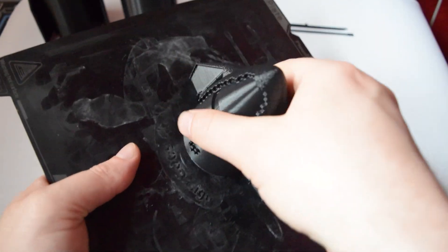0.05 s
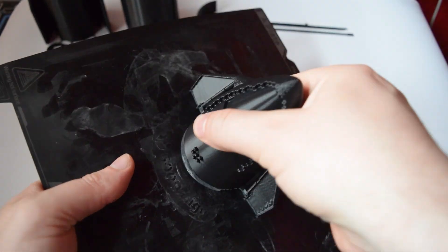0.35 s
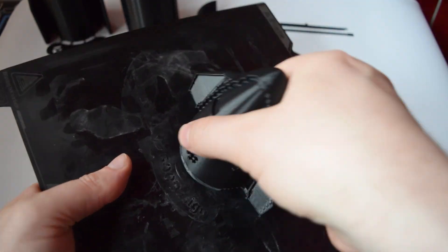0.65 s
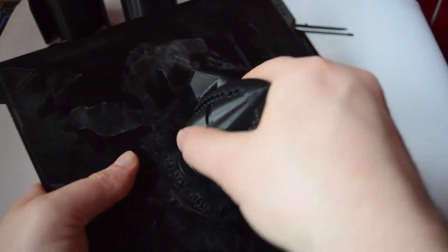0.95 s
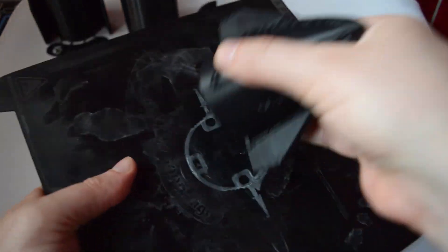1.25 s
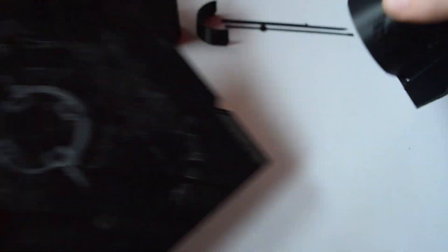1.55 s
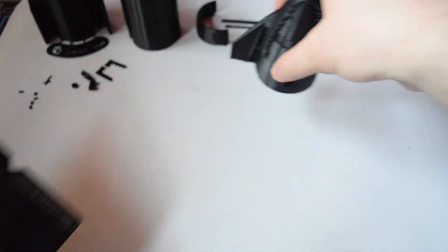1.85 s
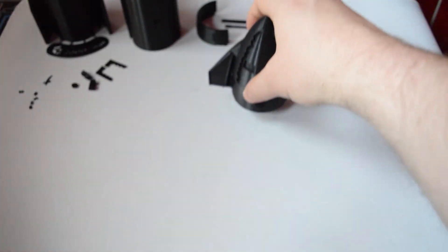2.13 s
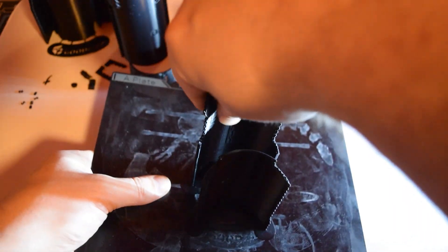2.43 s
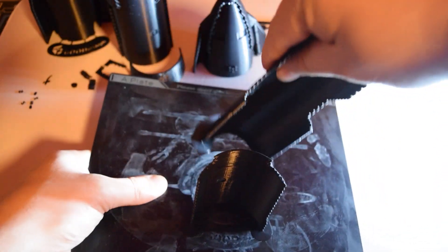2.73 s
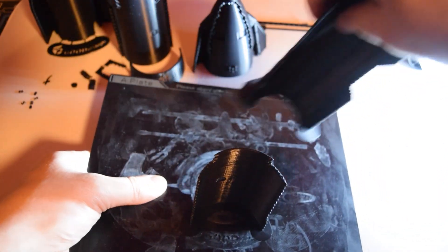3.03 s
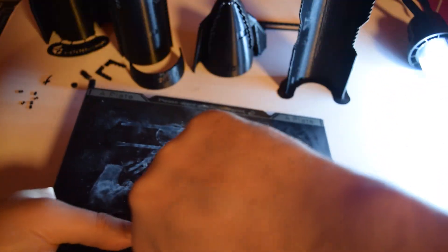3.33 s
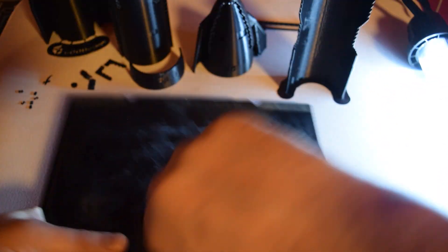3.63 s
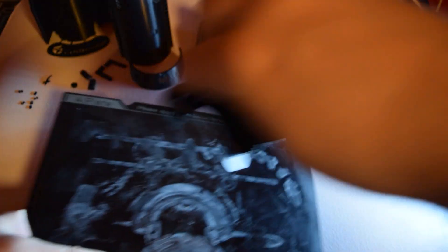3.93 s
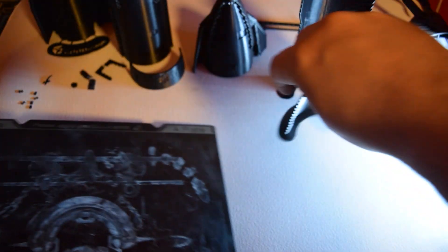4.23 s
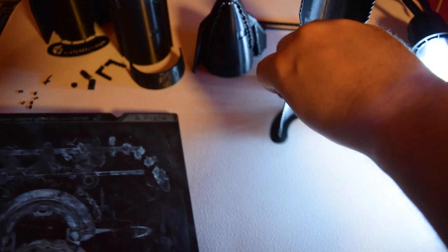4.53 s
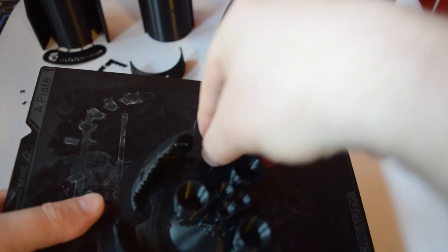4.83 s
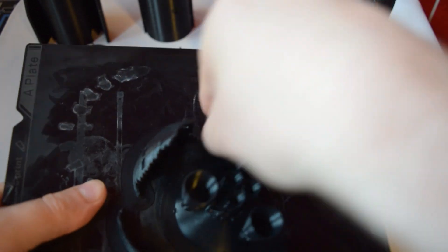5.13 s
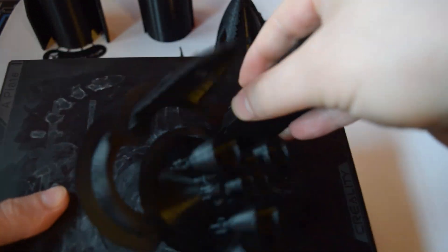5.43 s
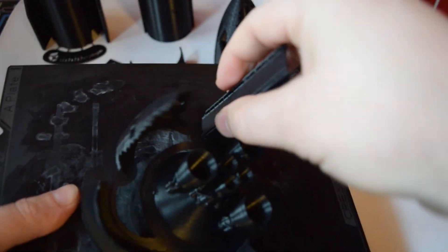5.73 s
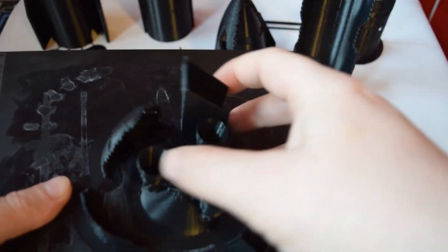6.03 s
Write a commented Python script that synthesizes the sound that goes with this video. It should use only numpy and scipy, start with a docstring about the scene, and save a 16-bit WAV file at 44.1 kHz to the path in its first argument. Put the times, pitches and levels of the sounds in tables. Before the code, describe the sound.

Hollow plastic parts snap off a flexible steel plate with sharp cracks, light knocks and faint rubbing in a small room.

```python
"""At a desk in a small room, hollow printed plastic parts are snapped off a flexible steel build plate.
Each snap is a bright crack as the bond breaks, then the hollow part, the desk and the room ring briefly.
Loose parts knock and tinkle, thin brims (flat rims around a part) tear in crackles, hands bump and rub.
The room echoes over a faint hum, and the close microphone overloads on the hardest snaps."""
import sys
import numpy as np
from scipy import signal
from scipy.fft import rfft, irfft
from scipy.io import wavfile

SR = 44100
rng = np.random.default_rng(int(sys.argv[2]) if len(sys.argv) > 2 else 0)


def put_to_file(sound):
    """Save the sound as 16-bit audio at rate SR, in the file named by the first command-line argument."""
    columns = np.atleast_2d(sound).T  # one column per channel
    safe = np.clip(columns, -1, 1)
    whole_steps = np.round(safe * 32767)
    wavfile.write(sys.argv[1], SR, whole_steps.astype(np.int16))


N = 276507
TIME = np.arange(N) / SR

# A "fade time", or t60, is how long a sound takes to drop by 60 dB.
# a part breaks free: (time [s], crack level [dB], crack pitch [Hz], crack fade time [s], ring level [dB])
SNAP_HITS = [(0.2666, -12.5, 4810, 0.02, -15.5), (1.11, 3, 5030, 0.026, -13),
             (1.1135, -5.5, 7640, 0.012, 3.5), (2.5786, 2.5, 8390, 0.019, -16),
             (2.5867, -11, 8000, 0.073, -7), (2.599, -1, 6500, 0.012, -14.5),
             (2.6212, -2, 7800, 0.0088, -28.5), (2.631, -14.5, 6960, 0.028, -40),
             (2.6591, -5.5, 5400, 0.032, -17.5), (3.541, -44.5, 6730, .03, -41.5),
             (3.643, 8, 7130, 0.014, -2), (3.7101, 0.5, 5280, 0.03, -13), (5.2345, -14, 8700, 0.13, -7.5),
             (5.2464, -2, 7280, 0.025, -11), (5.287, -9, 5860, 0.0093, -35), (5.2918, 5, 5660, 0.0077, -13),
             (5.296, 5, 4390, 0.01, -32), (5.3121, -8, 4600, 0.0081, -46), (5.407, -14, 6300, 0.015, -54),
             (5.416, -14.5, 11100, 0.027, -28), (5.728, -38, 11900, .04, -64),
             (5.9204, -25.5, 9840, 0.018, -26)]
# loose parts knock on the plate and on each other: (time [s], crack level [dB], ring level [dB])
KNOCK_HITS = [(0.2656, -25, -24), (.9107, -50, -34), (0.942, -51, -38), (1.0209, -53, -35),
              (1.042, -41, -27.5), (1.561, -42.5, -53.5), (2.5705, -16, -1.5), (3.651, -26.5, -9.5),
              (3.941, -43.5, -29), (4.046, -45, -44), (4.211, -48.5, -45), (4.956, -45, -17),
              (5.21, -44.5, -39), (5.4708, -26, -30.5), (5.572, -36, -51), (5.605, -27.5, -34),
              (5.656, -24, -24), (5.863, -24, -41), (5.881, -24, -23.5), (5.911, -31, -39),
              (5.924, -24.5, -14.5), (5.9475, -35, -24), (6.044, -44.5, -34), (6.1979, -46, -34)]
# the hollow note of the part in hand: (start time [s], pitch [Hz], fade time [s])
PART_NOTES = [(0, 710, 0.13), (.7, 920, 0.015), (3.2, 980, 0.023), (3.8, 817, 0.029), (5.275, 1791, 0.074),
              (5.34, 1070, 0.058), (5.54, 1578, 0.071), (5.8, 1077, 0.058), (5.9, 960, 0.021)]
# desk and room resonances that ring briefly after each hit: (pitch [Hz], level [dB], fade time [s])
DESK_ROOM_NOTES = [(250.9, -31, 0.086), (394, -28.5, 0.14), (450, -26, 0.045), (572.5, -23.5, 0.19),
                   (644.3, -19.5, 0.12), (746.5, -12.5, 0.069), (821, -15, 0.19), (868, -22.5, 0.28),
                   (889, -19, 0.32), (976, -14, 0.13), (1071, -17.5, 0.19), (1180, -21, 0.055),
                   (1274, -28.5, 0.32), (1404, -30.5, 0.31), (1510, -20.5, 0.057), (1772, -27, 0.11),
                   (2030, -25, 0.11)]
# thin fins and shells ring on after a hit: (time [s], pitch [Hz], level [dB], fade time [s])
FIN_RINGS = [(0.2652, 1160, -17, 0.032), (0.2654, 1520, -20.5, 0.047), (.2654, 1890, -26, .06),
             (.2666, 4530, -22.5, 0.039), (0.2658, 7930, -25, 0.027), (2.6594, 5250, -12, 0.043),
             (3.7118, 5720, -23, .08), (5.656, 3750, -17, 0.011)]
# the notes of a small curved shell: (pitch [Hz], level [dB], fade time [s])
SHELL_NOTES = [(1680, 0.5, 0.24), (2513, 0, 0.14), (3640, -7, 0.19), (4700, -0.5, 0.11),
               (11050, -13.5, 0.33)]
# that shell tinkles as it is lifted off and stood on the desk: (time [s], level [dB])
SHELL_TINKLES = [(3.9, -49.5), (4.044, -61), (4.11, -65.5), (4.208, -59), (4.315, -58.5)]
# hands, parts and plate bump the desk: (time [s], level [dB], pitch [Hz])
DESK_BUMPS = [(0.533, -46.5, 302), (0.91, -37, 263), (.925, -34.5, 590), (1.005, -35.5, 1050),
              (1.041, -33.5, 227), (1.043, -29.5, 673), (3.404, -29.5, 910), (3.94, -42.5, 253),
              (4.046, -30, 336), (4.11, -41.5, 318), (4.211, -34, 433), (4.595, -39, 226),
              (4.9499, -23, 337), (4.9605, -30, 480), (5.07, -39, 693), (5.184, -33.5, 610),
              (5.2, -28.5, 264.4), (5.207, -16.5, 549), (5.2125, -13, 768), (5.233, -29.5, 275),
              (5.922, -40.5, 235), (6.062, -29, 838), (6.196, -50.5, 334)]
# brims tear loose and rough edges scrape: (start [s], end [s], level [dB])
BRIM_TEARS = [(2.587, 2.611, -27), (2.652, 2.66, -27.5), (3.64, 3.663, -16), (3.903, 3.933, -49.5),
              (5.232, 5.265, -26.5), (5.296, 5.33, -45), (5.332, 5.411, -39.5), (5.35, 5.387, -32.5),
              (5.868, 5.887, -33), (6.061, 6.086, -48.5)]
# skin and plastic slide: (start [s], end [s], level [dB])
FINGER_RUBS = [(0.004, 0.08, -69.5), (0.534, 0.533, -48), (0.88, 0.956, -65.5), (1.573, 1.654, -68),
               (1.788, 1.943, -71), (2.229, 2.463, -62.5), (2.838, 2.912, -69), (2.965, 3.144, -75.5),
               (3.169, 3.526, -62), (3.886, 4.137, -62.5), (4.142, 4.417, -68.5), (4.551, 4.619, -58),
               (5.454, 5.618, -66.5), (5.973, 6.27, -68.5)]
# the tone of cracking plastic: (frequency [Hz], level [dB])
CRACK_TONE = [(60, -10.5), (220, -12.5), (500, -4.5), (1100, 2.5), (1700, 4.5), (2600, -1.5), (4000, -2),
              (6000, -3.5), (8500, -2.5), (10500, -3.5), (13000, -7.5), (16000, -14.5)]
# the tone of a rub's hiss: (frequency [Hz], level [dB])
HISS_TONE = [(200, -6.5), (900, 2.5), (2200, 1), (3300, -4.5), (5000, -1.5), (6800, -6), (9400, -6),
             (12000, -14.5), (16000, -26.5)]
# the tone of the plate's rumble under a rub: (frequency [Hz], level [dB])
RUMBLE_TONE = [(40, -14), (120, 0), (300, 8.5), (600, -8.5), (1000, -3.5), (2000, -5.5), (8000, -39)]
# the tone the walls give to echoes: (frequency [Hz], level [dB])
WALL_TONE = [(50, -7.5), (200, 0), (500, -1.5), (1000, -3), (2500, -0.5), (6000, -2.5), (10000, -3.5),
             (15000, -13.5)]
# how long the room's echo lasts: (frequency [Hz], fade time [s])
ROOM_FADES = [(100, 0.21), (400, 0.39), (900, 0.29), (2000, 0.41), (5000, .35), (9000, .27), (15000, 0.23)]
# the tone of still room air: (frequency [Hz], level [dB])
AIR_TONE = [(12, -41), (20, -22), (49, -2), (182, -12.5), (241, -14.5), (377, -17.5), (527, -17),
            (802, -17.5), (976, -14.5), (1370, -22.5), (1910, -20), (2460, -26.5), (8410, -36.5),
            (13500, -45.5), (16000, -66)]
# a faint appliance hum: (pitch [Hz], level [dB])
HUM_NOTES = [(50, -80), (100, -73.5), (242, -79.5)]

KNOCK_HZ, KNOCK_T60_S = 2800, 0.043  # a knock is duller than a snap
KNOCK_TOP_HZ = 11600  # knocks carry little above this; higher cracks reach further in proportion


def cracks(hiss_db=-9, notes_db=-2, note_count=7, spread_octaves=1.1, tick_db=-2, tick_s=0.00012):
    """The bond breaks or a part knocks: a tick stirs many high notes in the plastic; a few stand out."""
    out, t = np.zeros(N), TIME[:5000]
    for start, db, hz, t60, *_ in hits():
        noise = rng.standard_normal(len(t))
        pitches = hz * 2 ** (spread_octaves * rng.uniform(-1, 1, note_count))
        notes = sum(band(noise, pitch, q=22) for pitch in pitches)
        crack = unit(unit(band(noise, hz, q=1.9)) + gain(hiss_db) * noise + gain(notes_db) * unit(notes))
        tick = gain(tick_db) * np.exp(-t / tick_s)
        crack *= fade(t, t60) * (1 + tick)
        add(out, start, gain(db) * muffle(crack, KNOCK_TOP_HZ * hz / KNOCK_HZ))
    return shape_tone(out, CRACK_TONE)


def part_and_desk(desk_room_db=-4, reach_octaves=2.6):
    """At each snap or knock the hollow part rings, and the desk and room ring briefly with it."""
    out, t = np.zeros(N), TIME[:12000]
    note_hz = np.array(DESK_ROOM_NOTES)[:, 0]
    notes = np.array([gain(db) * np.exp(2j * np.pi * hz * t) * fade(t, t60)
                      for hz, db, t60 in DESK_ROOM_NOTES])
    for start, *_, ring_db, part_hz, part_t60 in hits():
        hollow = sine(part_hz, t) * fade(t, part_t60)
        # each hit lands on a new spot, so each note starts at a random point in its swing
        phases = np.exp(2j * np.pi * rng.random(len(notes)))
        # the part stirs the notes near its own pitch most
        distance = np.hypot(1, np.log2(note_hz / part_hz) / reach_octaves)
        desk_room = ((phases / distance) @ notes).imag
        add(out, start, gain(ring_db) * (hollow + gain(desk_room_db) * desk_room))
    return out


def hits():
    """List every snap and knock, each followed by the pitch and fade time of the part in hand."""
    knocks = [(start, db, KNOCK_HZ, KNOCK_T60_S, ring_db) for start, db, ring_db in KNOCK_HITS]
    part_changes = [start for start, _, _ in PART_NOTES[1:]]
    return [(*hit, *PART_NOTES[np.searchsorted(part_changes, hit[0])][1:]) for hit in SNAP_HITS + knocks]


def fins_and_shells(twin_ratio=1.017, twin_db=-5, rise_s=0.0008):
    """A hit spreads through a thin, nearly round shell, which rings in close pairs of notes that waver."""
    out, t = np.zeros(N), TIME[:18000]
    rise = 1 - np.exp(-(t / rise_s) ** 2)
    tinkles = [(start, hz, db + note_db, t60)
               for start, db in SHELL_TINKLES for hz, note_db, t60 in SHELL_NOTES]
    for start, hz, db, t60 in FIN_RINGS + tinkles:
        pair = sine(hz, t) + gain(twin_db) * sine(hz * twin_ratio, t, rng.random())
        add(out, start, gain(db) * pair * fade(t, t60) * rise)
    return out


def bumps(rise_s=0.0054, thud_db=-1, fade_swings=30, desk_hz=140, desk_t60=0.3):
    """A soft touch pushes slowly: a low note in a dull thud. The lower it is, the more the desk booms."""
    out, t = np.zeros(N), TIME[:9000]
    rise = 1 - np.exp(-t / rise_s)
    boom = gain(-0.5) * sine(desk_hz, t) * fade(t, desk_t60)
    for start, db, hz in DESK_BUMPS:
        thud = unit(band(rng.standard_normal(len(t)), hz, q=0.65))
        bump = (sine(hz, t) + gain(thud_db) * thud) * fade(t, fade_swings / hz)
        bump += boom * min(desk_hz / hz, 0.5) ** 2
        add(out, start, gain(db) * muffle(bump * rise, 1.4 * hz, order=5))
    return out


def tears(ticks_per_s=900, uneven_db=1.5, tick_t60=0.0042, plate_hz=1150, top_hz=12500):
    """A thin edge catches and lets go in a run of tiny uneven ticks that shake the plate."""
    out, t = np.zeros(N), TIME[:600]
    for start, end, db in BRIM_TEARS:
        length = max(int((end - start) * SR), len(t))
        lets_go = rng.random(length) < ticks_per_s / SR
        strength = rng.standard_normal(length)
        ticks = lets_go * np.sign(strength) * gain(uneven_db * np.abs(strength))
        ticks[0] = 1  # every tear opens with a tick
        tick_sound = rng.standard_normal(len(t)) * fade(t, tick_t60)
        crackle = shape_tone(signal.fftconvolve(ticks, tick_sound), CRACK_TONE)
        add(out, start, gain(db) * unit(muffle(crackle, top_hz) + band(crackle, plate_hz, q=4.2)))
    return out


def rubs(ramp_s=0.096, rumble_db=3):
    """Fingers and parts catch and slip on the printed ridges: a gritty hiss over the plate's rumble."""
    ridges = wobble(per_s=900, depth_db=3.5)
    hiss = unit(shape_tone(rng.standard_normal(N) * ridges, HISS_TONE))
    rumble = unit(shape_tone(rng.standard_normal(N), RUMBLE_TONE))
    touch = np.zeros(N)
    for start, end, db in FINGER_RUBS:
        touch += gain(db) * np.clip(np.minimum(TIME - start, end - TIME) / ramp_s + 0.5, 0, 1)
    catching = wobble(per_s=70, depth_db=2.6)
    pressure = wobble(per_s=12, depth_db=3.5)
    return (hiss + gain(rumble_db) * rumble) * touch * catching * pressure


def room_echo(sound, near_db=-9, near_t60=0.055, near_delay_s=0.003, tail_db=-12, tail_rise_s=0.0064):
    """Echoes only: sound bounces quickly off the desk and the things on it, then dies away in the room."""
    size = 24000
    t, hz = TIME[:size], np.arange(size // 2 + 1) * SR / size
    bounces = rng.standard_normal(size) * (rng.random(size) < 0.1)
    near = bounces * fade(t, near_t60) * (t > near_delay_s)
    spectrum = rfft(rng.standard_normal(size))
    centres, fade_times = np.transpose(ROOM_FADES)
    tail = np.zeros(size)
    for one_band, t60 in zip(np.eye(len(centres)), fade_times):  # each band fades at its own speed
        share = curve(list(zip(centres, one_band)), hz)
        tail += irfft(spectrum * share) * fade(t, t60)
    tail *= np.clip(t / tail_rise_s - 0.5, 0, 1)
    echoes = gain(near_db) * near / np.linalg.norm(near) + gain(tail_db) * tail / np.linalg.norm(tail)
    return through(sound, shape_tone(echoes, WALL_TONE))


def air_and_hum(air_db=-62):
    """Still room air murmurs under the faint, steady hum of an appliance."""
    hum = sum(gain(db) * np.sqrt(2) * sine(hz, TIME, rng.random()) for hz, db in HUM_NOTES)
    return gain(air_db) * unit(shape_tone(rng.standard_normal(N), AIR_TONE)) + hum


def gain(db):
    """Turn decibels into a number to multiply by."""
    return 10 ** (np.asarray(db) / 20)


def unit(sound):
    """Scale a sound to an average (rms) size of 1."""
    return sound / np.sqrt(np.mean(sound ** 2))


def sine(hz, t, head_start=0):
    """A pure note; its head start is a fraction of one swing."""
    return np.sin(2 * np.pi * (hz * t + head_start))


def fade(t, t60):
    """A smooth fade that is 60 dB down after t60 seconds."""
    return np.exp(-np.log(1000) * t / max(t60, 0.001))


def wobble(per_s, depth_db):
    """A volume that glides between random levels, per_s of them each second."""
    return gain(depth_db * np.interp(TIME * per_s, np.arange(N), rng.standard_normal(N)))


def curve(points, hz):
    """Read between (frequency, value) points, giving each octave equal room."""
    frequencies, values = np.transpose(points)
    return np.interp(np.log(np.maximum(hz, 1)), np.log(frequencies), values)


def through(sound, response):
    """Pass a sound through a filter or room, given its response to one click."""
    return signal.fftconvolve(sound, response)[:len(sound)]


def shape_tone(sound, tone, size=4096):
    """Make each frequency louder or softer, as a tone table says."""
    gains = gain(curve(tone, np.arange(size // 2 + 1) * SR / size))
    cepstrum = irfft(np.log(gains))
    # folding this onto its first half makes the filter ring after a click, never before
    cepstrum[1:size // 2] *= 2
    cepstrum[size // 2 + 1:] = 0
    return through(sound, irfft(np.exp(rfft(cepstrum))))


def band(sound, hz, q):
    """Keep the frequencies near hz; a higher q keeps a narrower band."""
    angle = 2 * np.pi * min(hz, 0.4 * SR) / SR
    width = np.sin(angle) / (2 * q)
    return signal.lfilter([width, 0, -width], [1 + width, -2 * np.cos(angle), 1 - width], sound)


def muffle(sound, hz, order=4):
    """Soften the treble above hz."""
    return signal.sosfilt(signal.butter(order, min(hz, 0.4 * SR), fs=SR, output="sos"), sound)


def add(track, start, sound):
    """Mix a sound into a track at a start time in seconds."""
    i = max(int(start * SR), 0)
    track[i:i + len(sound)] += sound[:max(N - i, 0)]


def scene(echo_count=2):
    """Mix snaps, handling noises, their echoes and the quiet room into one channel."""
    snaps = cracks() + part_and_desk()
    handling = fins_and_shells() + bumps() + tears() + rubs()
    # a snapping part throws a different mix of its notes at each wall, so the echo is dense and smooth
    snap_echoes = sum(room_echo(cracks() + part_and_desk()) for _ in range(echo_count))
    echoes = snap_echoes / np.sqrt(echo_count) + room_echo(handling)
    return (snaps + handling + echoes + air_and_hum())[None]


def record(dry, ceiling=0.39, top_hz=16000):
    """The microphone input flattens the hardest peaks, and the highest treble is cut."""
    flattened = dry / (1 + (dry / ceiling) ** 8) ** (1 / 8)
    return signal.sosfilt(signal.ellip(8, 0.2, 70, top_hz, fs=SR, output="sos"), flattened)


dry = scene()
out = record(dry)
put_to_file(out)
```